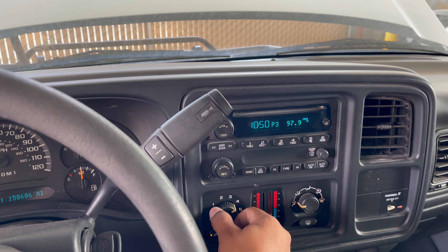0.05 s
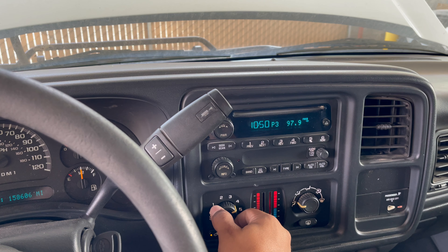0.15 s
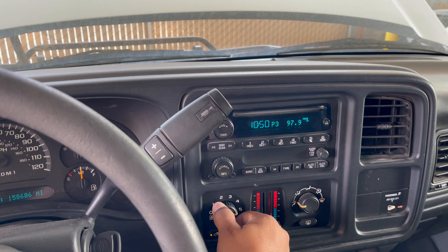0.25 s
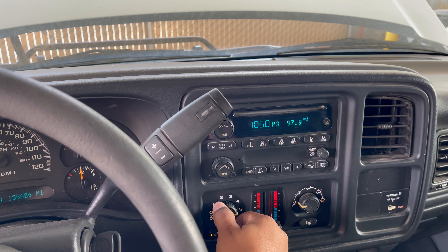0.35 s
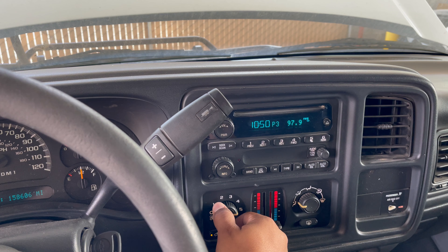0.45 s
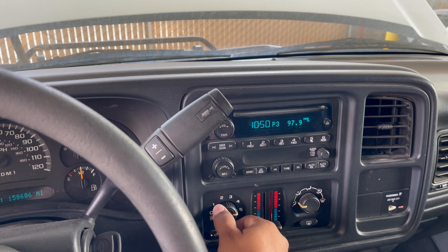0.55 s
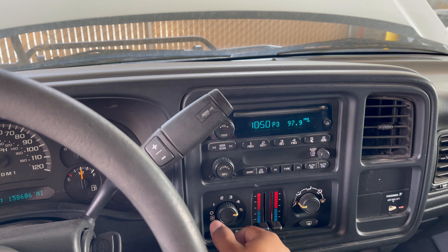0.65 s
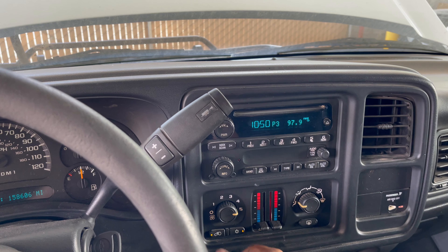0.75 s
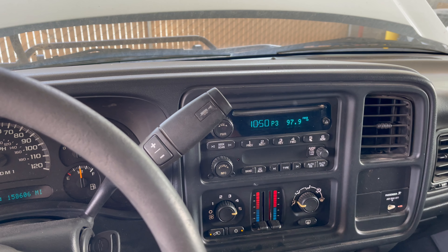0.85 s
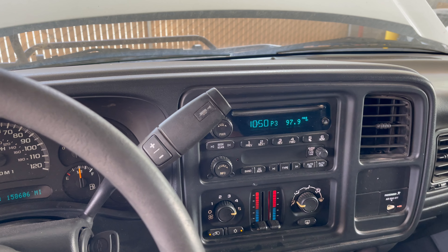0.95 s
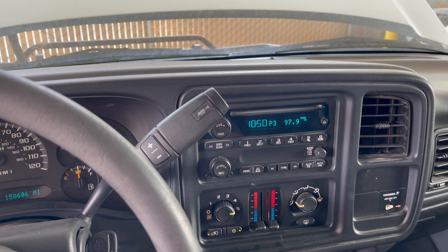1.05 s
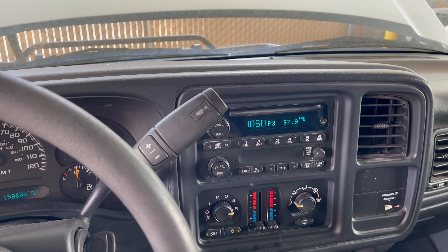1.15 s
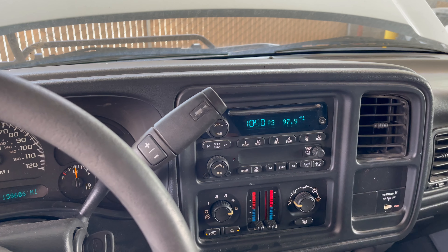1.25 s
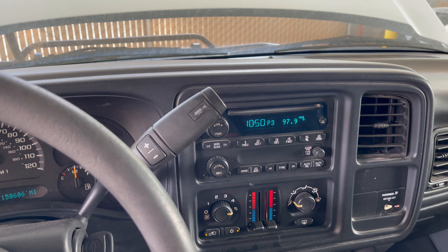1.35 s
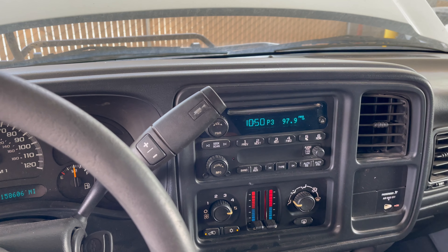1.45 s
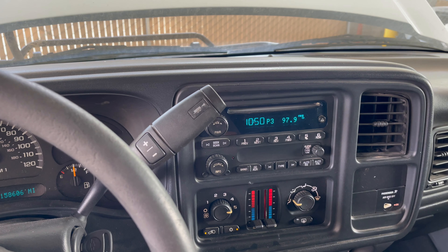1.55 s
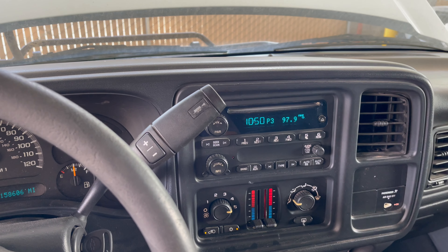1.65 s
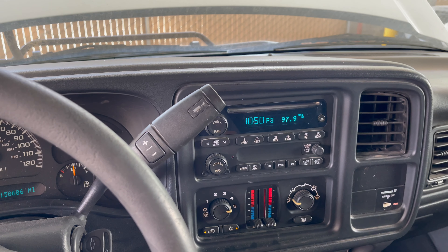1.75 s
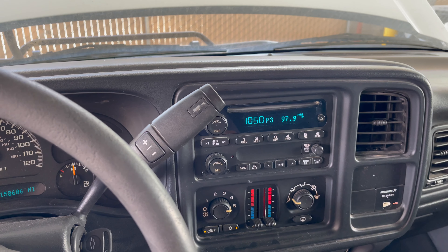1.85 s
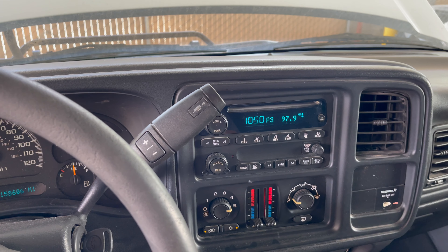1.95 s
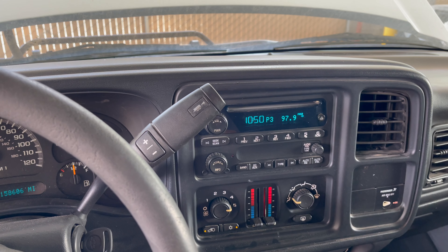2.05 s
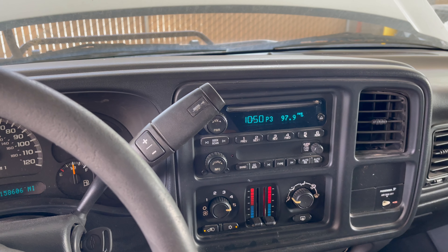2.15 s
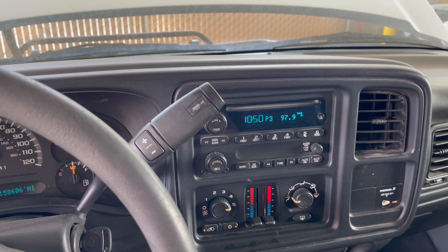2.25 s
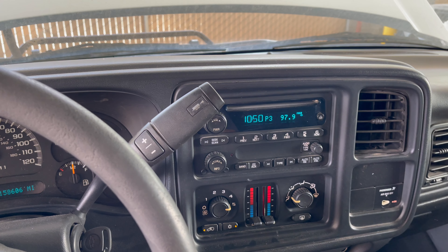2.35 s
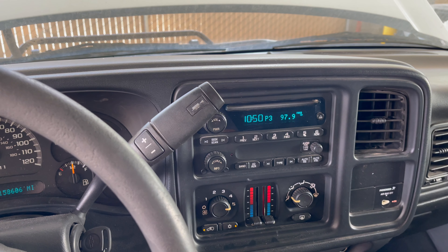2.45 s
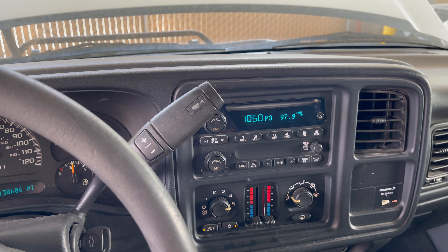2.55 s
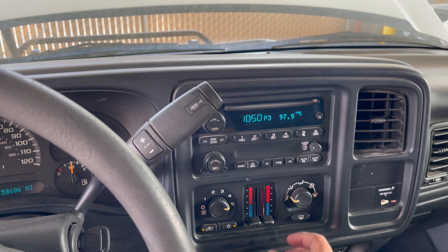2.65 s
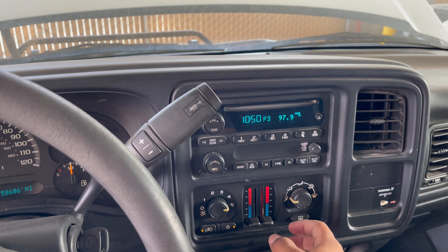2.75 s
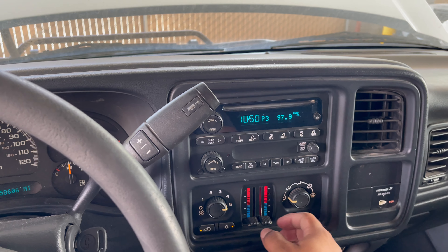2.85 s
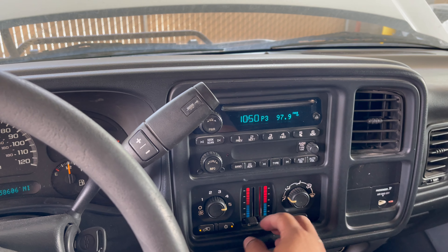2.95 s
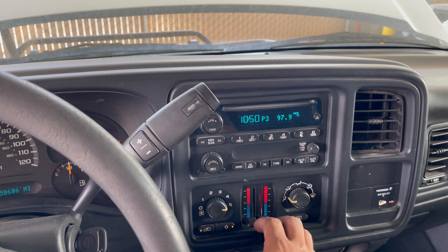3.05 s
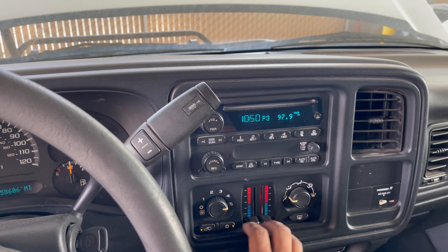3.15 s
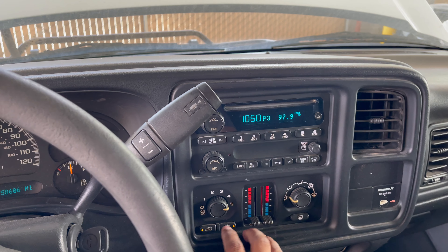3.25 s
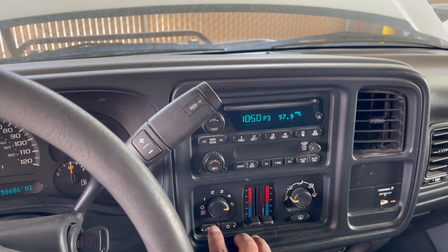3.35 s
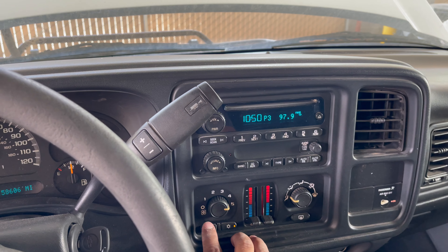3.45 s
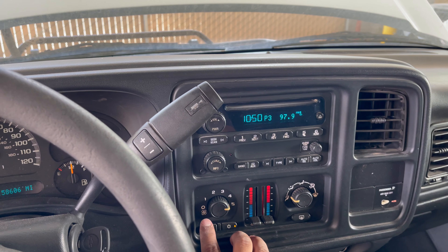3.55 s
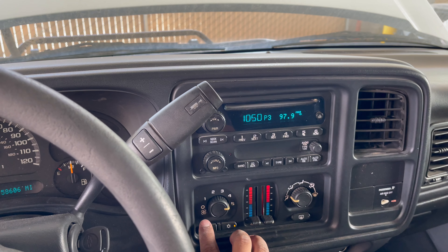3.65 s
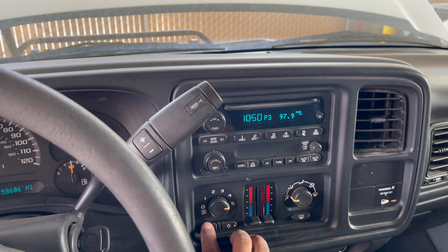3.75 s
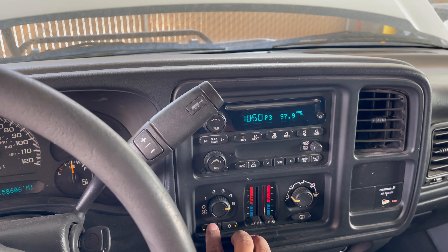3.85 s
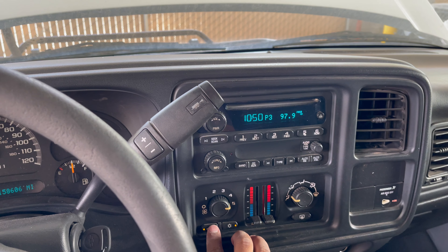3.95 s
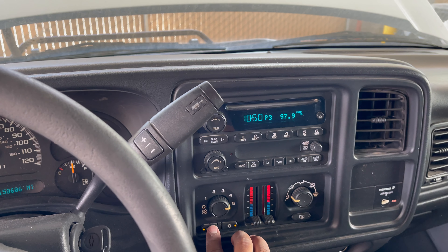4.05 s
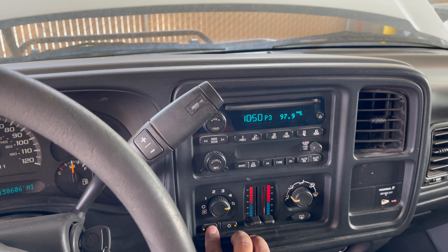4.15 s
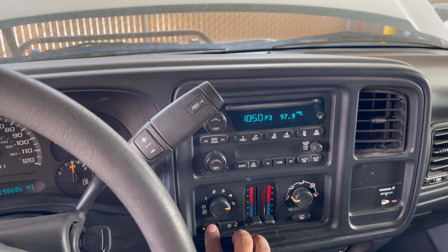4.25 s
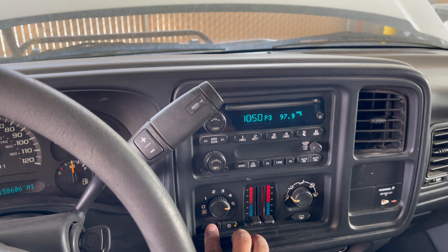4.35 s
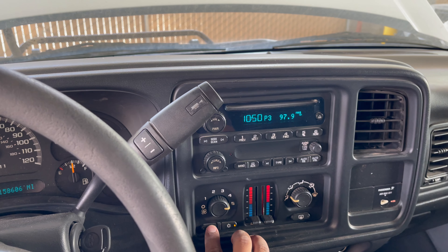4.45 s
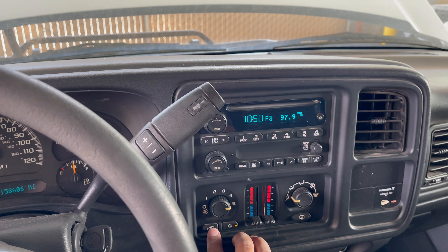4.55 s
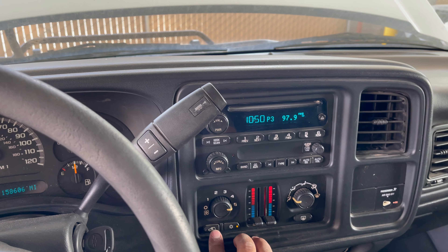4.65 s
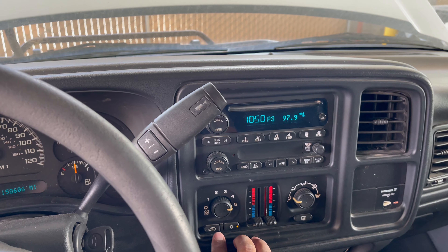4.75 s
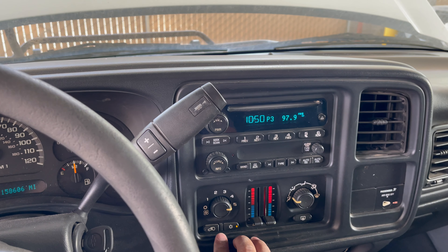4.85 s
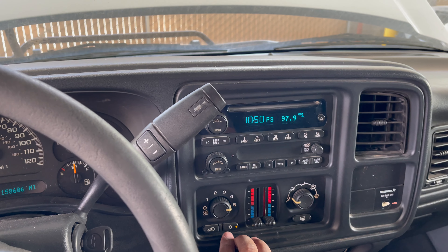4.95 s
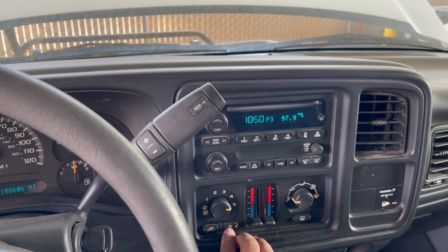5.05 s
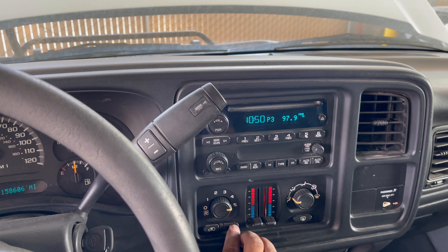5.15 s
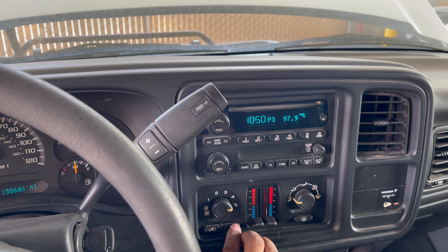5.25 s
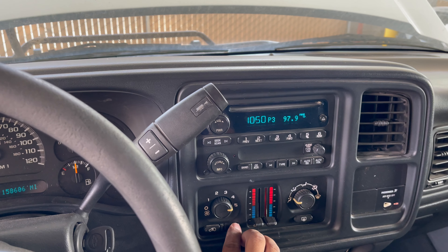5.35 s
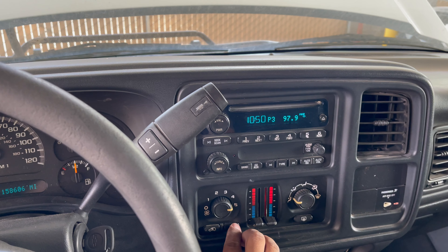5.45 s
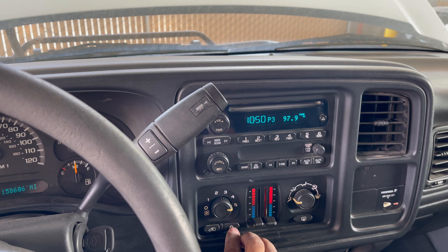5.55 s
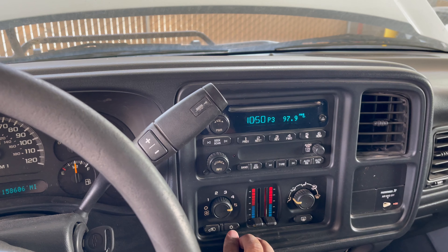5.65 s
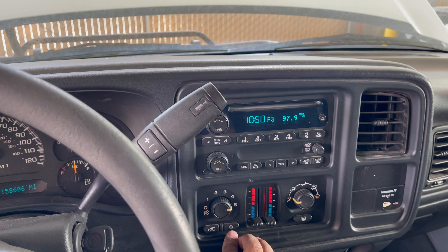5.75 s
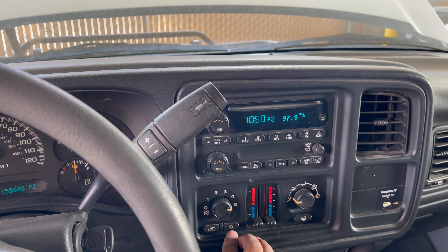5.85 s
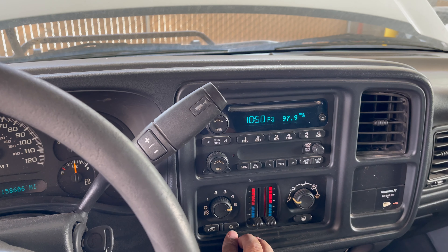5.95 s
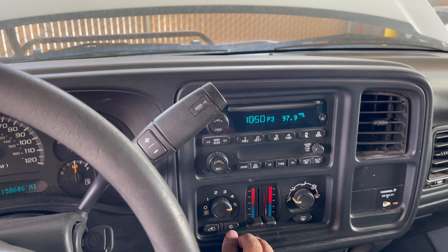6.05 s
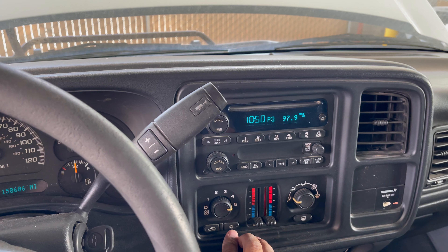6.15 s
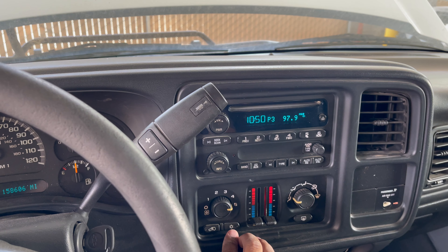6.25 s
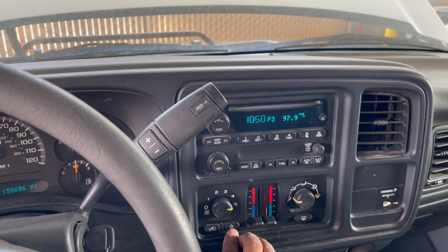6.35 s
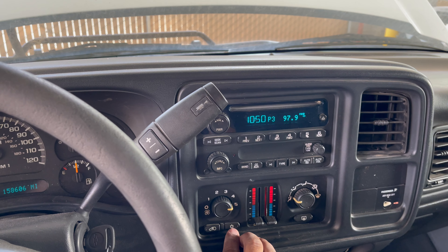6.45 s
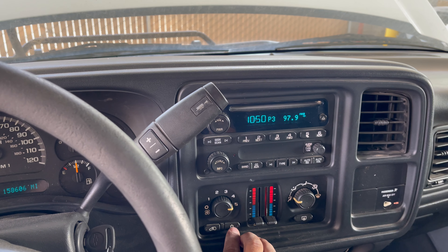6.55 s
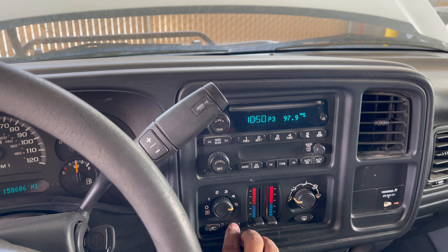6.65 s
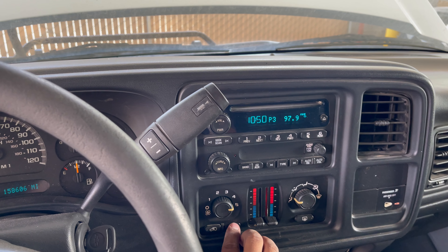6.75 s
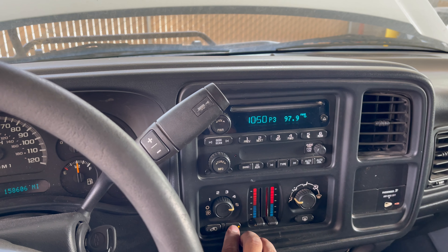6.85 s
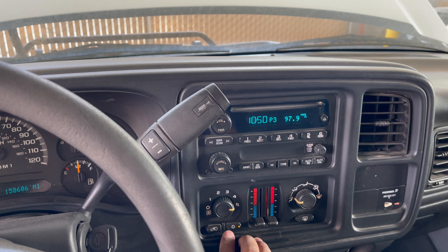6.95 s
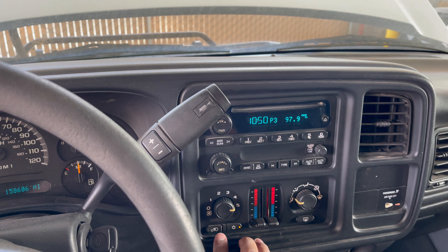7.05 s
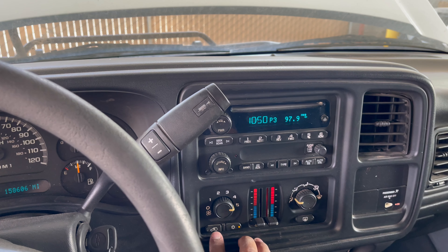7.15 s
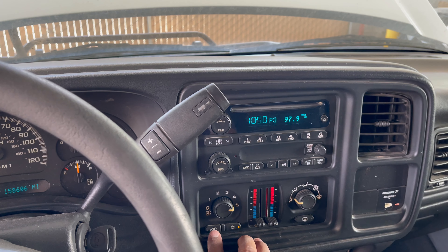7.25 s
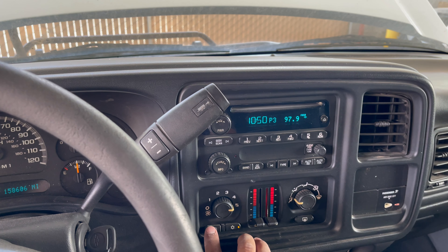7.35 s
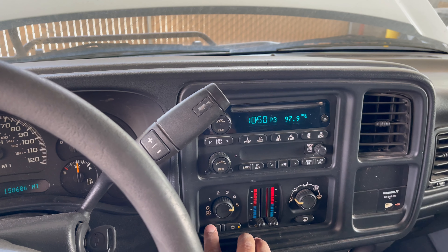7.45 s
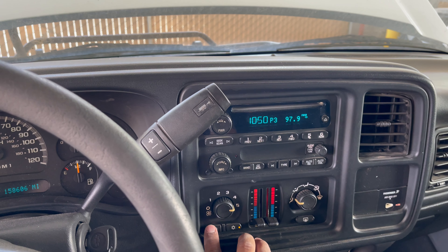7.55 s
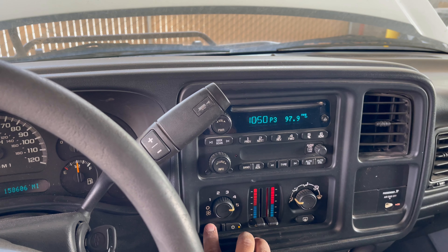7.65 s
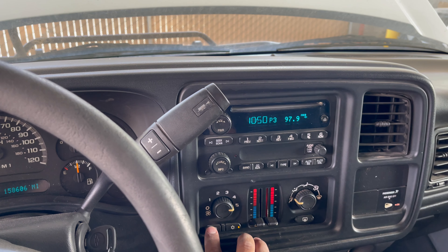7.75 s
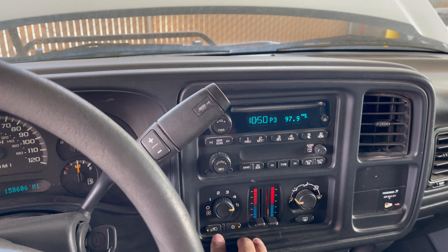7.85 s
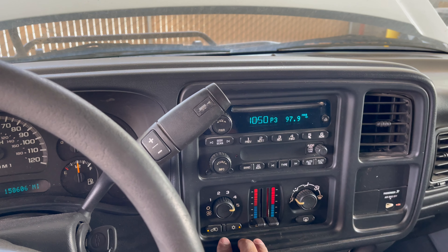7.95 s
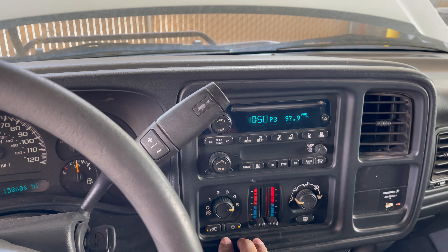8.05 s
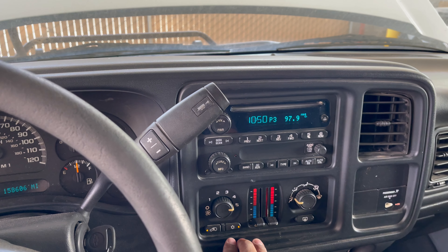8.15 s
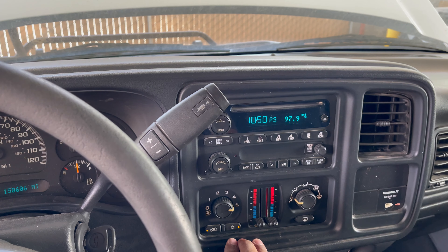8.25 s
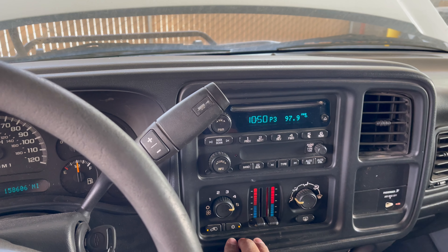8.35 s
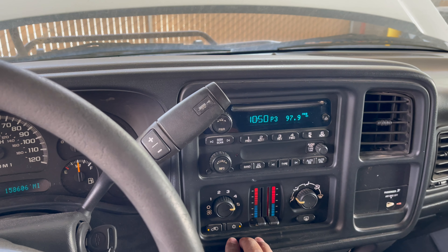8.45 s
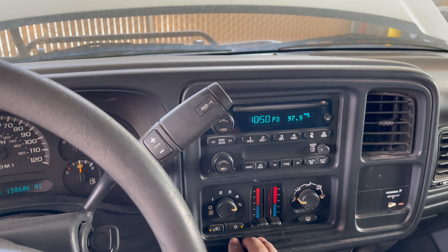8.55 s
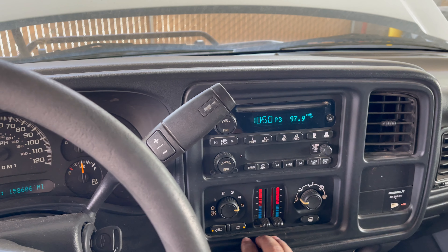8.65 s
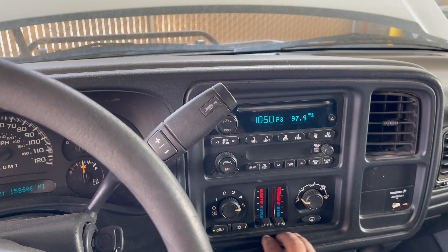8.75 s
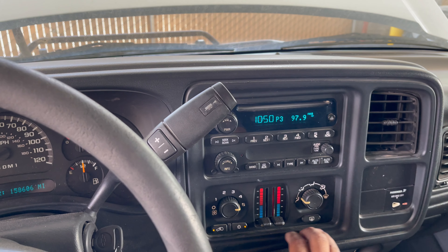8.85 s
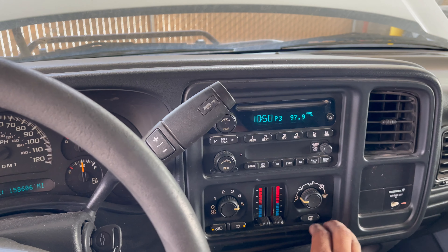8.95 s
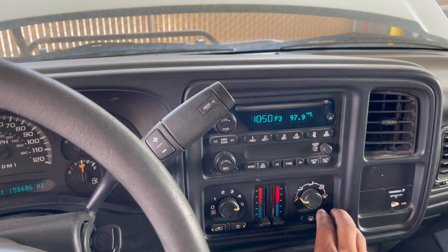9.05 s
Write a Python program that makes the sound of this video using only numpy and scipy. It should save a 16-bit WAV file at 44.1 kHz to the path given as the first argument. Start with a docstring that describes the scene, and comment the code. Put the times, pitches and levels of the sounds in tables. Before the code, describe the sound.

Inside a parked truck cab with the engine idling as a pure, very low hum, a plastic fan switch clicks almost at once. The blower climbs quickly for a moment, then holds a steady airy rush with faint breathy whistles from the vents. Its deep shaft hum beats slowly against the engine. The phone microphone sits in the air stream, so irregular thuds and sharp puffs buffet it until the end.

```python
"""A dashboard blower is switched up a step in a parked truck cab, heard by a phone held in the air stream.
First the switch clicks; then the fan shaft climbs past the idle hum of the engine and beats against it.
Shaped noise rushes and whistles from the vents, and noise puffs buffet the two microphone ports.
Meanwhile the phone folds more and more of the bass to mono, by feeding the left port to both channels."""
import sys
import numpy as np
from scipy import signal
from scipy.fft import rfft, irfft, next_fast_len
from scipy.io import wavfile
from scipy.ndimage import uniform_filter1d

SR = 44100
rng = np.random.default_rng(int(sys.argv[2]) if len(sys.argv) > 2 else 0)


def int16_out(signal):
    """Quantize to a 16-bit WAV file."""
    q = np.round(np.clip(np.atleast_2d(signal).T, -1, 1) * 32767)
    wavfile.write(sys.argv[1], SR, q.astype(np.int16))


def how_loud(loudness_db):
    """Turn decibels into a plain amplitude multiplier (0 dB gives 1, 20 dB gives 10)."""
    steps = np.asarray(loudness_db, float) / 20
    return 10 ** steps


N = 401310
T = np.arange(N) / SR  # time of each sample [s]
SIZE = next_fast_len(N)
HZ = np.arange(SIZE // 2 + 1) * SR / SIZE  # pitch of each spectrum bin

# colour of the thud of an eddy: (frequency [Hz], relative level [dB])
THUD = [(35, -10), (70, 3.5), (200, -5.5), (450, -11.5), (900, -21.5), (2000, -80), (6000, -120)]

STREAM_HIGH_DB = -36  # level of the air stream once the fan has settled
CANCEL_S = 2.06  # moment when the engine and shaft tones are opposed


def level(x, db):
    """Set the overall rms level in dB."""
    return x * how_loud(db) / np.sqrt(np.mean(x ** 2))


def over_hz(table):
    """Read a (frequency, value) table at every bin, evenly along a log pitch axis."""
    hz, value = np.transpose(table)
    return np.interp(np.log(HZ + 1), np.log(hz + 1), value)


def shape(x, gain):
    """Filter a sound by multiplying its spectrum."""
    return irfft(rfft(x, SIZE) * gain, SIZE)[..., :N]


def around(hz, log_width):
    """A smooth bell over pitch, for picking out one band."""
    return np.exp(-(np.log((HZ + 1) / hz) / log_width) ** 2)


def walk(rate):
    """Random wander with an rms of 1: rate new levels a second, smoothed twice."""
    k = int(SR / rate)
    steps = np.repeat(rng.standard_normal(N // k + 1), k)
    smooth = uniform_filter1d(uniform_filter1d(steps, k), k)
    return level(smooth[:N], 0)


def column(table, index):
    """Read one column of a table at every sample; its first column is time."""
    rows = np.array(table)
    return np.interp(T, rows[:, 0], rows[:, index])


def flow_db():
    """Level of the air stream: low, then easing up with the inertia of the fan after the switch."""
    low_db, switch_s, settle_s = -38.5, 0.24, 0.16
    return STREAM_HIGH_DB + (low_db - STREAM_HIGH_DB) * np.exp(-np.maximum(T - switch_s, 0) / settle_s)


def rush():
    """Smooth vent noise coloured by the ducts; the ports share part of it, with a lag that turns with pitch."""
    # colour of the rush: (frequency [Hz], relative level [dB])
    air_colour = [(26, -88), (40, -57), (60, -50.5), (110, -54), (250, -61), (700, -65.5), (2000, -68.5),
                  (3200, -75), (3900, -80), (6600, -82.5), (7200, -87.5), (8600, -89.5), (11600, -91.5),
                  (12450, -112), (12700, -150)]
    # duct and port resonances: (frequency [Hz], width [Hz], left boost [dB], right boost [dB])
    ducts = [(1040, 72, 9.5, -2.5), (1450, 79, 2.5, 2), (1510, 506, 7, 1.5), (4710, 710, 4.5, 0),
             (6240, 430, 2, -5), (10400, 3250, 7.5, 7.5)]
    # balance of the ports: (frequency [Hz], left minus right [dB])
    balance = [(60, -3.5), (110, 2), (200, 1), (360, -3), (640, 3), (1170, -3), (2110, 2.5), (3820, 3.5),
               (6910, 2), (12500, -0.5)]
    # likeness of the two ports: (frequency [Hz], share [0-1])
    alike_table = [(500, 0.05), (860, 0.15), (1150, 0.24), (1600, 0.61), (2600, 0.3), (5500, 0.2),
                   (7000, 0.27), (8350, 0.36), (8900, 0.63), (10200, 1), (11400, 0.72), (11900, .99)]
    # lag of the shared part: (frequency [Hz], left leads by [radians])
    lead_table = [(0, 0), (520, -0.1), (780, 1.4), (1460, 4.8), (1980, 4.5), (3270, 9.4), (5430, 3.2),
                  (6720, 6.7), (7670, 0.3), (8790, -0.2), (9730, -2.9), (10400, -3.2), (11700, -6.1),
                  (12700, -6.4)]

    left, own = rng.standard_normal((2, N))
    alike = np.clip(over_hz(alike_table), 0, 1)
    lead_hz, lead = np.transpose(lead_table)
    lag = np.exp(-1j * np.interp(HZ, lead_hz, lead))
    right = shape(left, alike * lag) + shape(own, np.sqrt(1 - alike ** 2))

    colour_db = over_hz(air_colour) + np.outer([0.5, -0.5], over_hz(balance))
    for hz, width_hz, *port_db in ducts:
        colour_db = colour_db + np.outer(port_db, np.exp(-(2 * (HZ - hz) / width_hz) ** 2))
    air = shape(np.array([left, right]), how_loud(colour_db))

    # the stream flaps across the ports, so the middle of the rush flutters
    middle = shape(air, around(900, 0.89))
    flutter_db = [2.0 * walk(70) + 1.1 * walk(30), 3.67 * walk(70) + 1.1 * walk(30)]
    air = air + middle * (how_loud(flutter_db) - 1)
    # lower down the rush comes in choppy patches, each band on its own
    for hz in (221, 415, 740):
        patch = shape(air, around(hz, 0.36))
        air = air + patch * (how_loud([2.16 * walk(22), 2.2 * walk(22)]) - 1)
    # the high duct hiss waxes and wanes slowly
    hiss = shape(air, around(4900, 0.2))
    air = air + hiss * (how_loud(walk(1.64)) - 1)

    # the band that sets the level; it sits 3 dB above the stream level
    audible = shape(air, (HZ > 900) & (HZ < 6000))
    flicker_db = np.array([0.63 * walk(9), 0.28 * walk(8)])
    return air / np.std(audible) * how_loud(flow_db() + flicker_db + 3.0)


def gust_db():
    """Strength of the buffeting: a chance wander that follows the stream, with gusts added on top."""
    # gusts: (time [s], strength [dB], half length [s])
    swells = [(0.454, -26.5, 0.2), (0.985, -24, 0.035), (1.283, -22, 0.021), (1.924, -25, 0.061),
              (2.713, -26.5, 0.065), (3.223, -30, 0.19), (3.856, -31, 0.016), (4.557, -25.5, 0.035),
              (6.57, -37, 0.049), (7.152, -37, 0.035), (7.8, -21, 0.016), (8.173, -27, 0.05),
              (8.54, -31, 0.021), (8.863, -24.5, 0.034)]
    usual_db, wander_db, wanders_per_s = -29, 1.5, 12
    wander = wander_db * np.tanh(walk(wanders_per_s))
    power = how_loud(usual_db + flow_db() - STREAM_HIGH_DB + wander) ** 2
    for s, db, half_s in swells:
        power = power + how_loud(db) ** 2 * np.exp(-((T - s) / half_s) ** 2)
    return 10 * np.log10(power)


def gusts():
    """Eddies break on each port in uneven noise puffs; thuds and snaps swell together, snaps louder right."""
    # colour of a snap on the left port: (frequency [Hz], relative level [dB])
    left_colour = [(150, -6), (400, -4), (800, 1.5), (1500, 1), (2600, -14.5), (4500, -24), (9000, -70),
                   (13000, -110)]
    # crisper colour on the right port: (frequency [Hz], relative level [dB])
    right_colour = [(150, -30), (500, -2), (1000, 3), (1800, 3), (2800, -12), (4500, -24), (9000, -70),
                    (13000, -110)]
    ports, stream_db, strength_db = [], flow_db(), gust_db()
    for snap_db, spread_db, colour in [(-4.0, 9.3, left_colour), (-2.5, 19.0, right_colour)]:
        swell = walk(18)
        # the small eddies level off: none grows into a full buffet
        puffs_db = 16 * np.tanh((spread_db * walk(250) + 4 * swell) / 16)
        snaps = shape(rng.standard_normal(N) * how_loud(puffs_db), how_loud(over_hz(colour)))
        heaves_db = 4.4 * np.tanh((6.0 * walk(50) + 2.9 * walk(26) + 0.66 * swell) / 4)
        thuds = shape(rng.standard_normal(N) * how_loud(heaves_db), how_loud(over_hz(THUD)))
        # a slower stream sheds far weaker eddies
        snap_gain = how_loud(0.44 * strength_db - 23.0 + 2.3 * (stream_db - STREAM_HIGH_DB))
        ports.append(level(snaps, snap_db) * snap_gain + level(thuds, -4.0) * how_loud(strength_db))
    return np.array(ports)


def bursts(times, levels_db, length_s, colour, shifts):
    """A puff of noise at each time, its colour shifted in pitch; each level is the rms at its loudest."""
    t = np.arange(-1000, 1000) / SR
    # a sharp core inside a weaker, ragged skirt
    skirt = np.exp(-(t / np.where(t < 0, 0.004, 0.007)) ** 2)
    swell = np.exp(-(t / length_s) ** 2) + how_loud(-10.0) * skirt
    # one pressure dip at the centre keeps the click whole across pitch
    suck = -how_loud(15.0) * (t == 0)
    spectra = rfft(rng.standard_normal((len(times), len(t))) * swell + suck)
    log_hz = np.log(np.fft.rfftfreq(len(t), 1 / SR) + 1)
    colour_hz, colour_db = np.transpose(colour)
    out = np.zeros(N + len(t))
    for s, db, shift, spectrum in zip(times, levels_db, shifts, spectra):
        gain = how_loud(np.interp(log_hz, np.log(shift * colour_hz), colour_db))
        puff = irfft(spectrum * gain) * np.hanning(len(t))
        top = uniform_filter1d(puff ** 2, size=120).max()
        start = int(s * SR)
        out[start:start + len(t)] += how_loud(db) * puff / np.sqrt(top)
    return out[len(t) // 2:][:N]  # centres each puff on its time


def buffets():
    """Each strong eddy snaps on either port and thuds in both, as short bursts of noise."""
    # strongest buffets: (time [s], left snap [dB], right snap [dB], thud [dB], snap centre [Hz])
    strong = [(0.35, -28, -29, -27, 900), (0.395, -30, -34, -25, 800), (0.48, -28, -31, -27, 900),
              (0.52, -30, -29, -29, 905), (0.656, -28, -23, -32, 1300), (1.238, -31, -23, -45, 2200),
              (1.258, -25, -26, -26, 800), (1.267, -28, -29, -36, 1500), (1.284, -29, -27, -35, 1300),
              (1.347, -29, -23.5, -41, 2250), (1.882, -25, -26, -32, 910), (2.209, -26, -31, -24.5, 1290),
              (2.4, -20, -23, -23, 1360), (2.52, -21, -27, -21, 1000), (2.698, -24, -23.5, -22.5, 1400),
              (3.04, -41, -22, -41, 1650), (3.24, -30, -38, -21, 1080), (3.59, -26, -30, -26, 1420),
              (3.748, -23, -31, -39, 1160), (3.891, -31, -22.5, -45, 1400), (4.017, -33, -27, -45, 2200),
              (4.028, -29, -24, -37, 1700), (4.0349, -15.5, -20, -18.5, 1650), (4.039, -27, -31, -28, 1300),
              (4.212, -33, -23, -43, 1430), (4.829, -24, -23, -45, 1400), (5.802, -29, -21, -25, 1010),
              (5.878, -20, -31, -28, 1100), (6.037, -23, -37, -26.5, 2100), (6.15, -29, -24, -40, 1430),
              (6.513, -22, -25, -35, 970), (6.575, -32, -23, -25, 2100), (6.733, -24, -27, -35, 1700),
              (6.746, -30, -24, -22.5, 1700), (6.921, -19, -24, -27, 1500), (6.927, -28, -29, -24, 1000),
              (7.365, -17.5, -24, -25, 1450), (7.484, -28, -27, -45, 1720), (7.531, -35, -23, -20, 1630),
              (7.789, -39, -30, -23, 800), (7.804, -32, -30, -21, 700), (8.02, -28, -24, -31, 1300),
              (8.159, -30, -24, -45, 1380), (8.166, -29, -27, -40, 1400), (8.188, -21.5, -35, -22.5, 700),
              (8.202, -18.5, -28, -20, 1100), (8.2048, -22, -28, -38, 1400), (8.207, -23, -33, -43, 1550),
              (8.421, -27, -22, -29, 1600), (8.659, -35, -24, -21, 1760), (8.79, -30, -20.5, -45, 1670),
              (8.8405, -29, -22.5, -37, 2400), (8.8425, -27, -24, -38, 1600)]
    # colour of the snap of a strong eddy: (frequency [Hz], relative level [dB])
    snap_colour = [(150, -11), (400, -1), (800, 0.5), (1400, 4), (2300, -11.5), (3300, -20.5), (6000, -65),
                   (13000, -110)]
    colour_centre_hz = 1360  # a smaller eddy shifts it up
    times, left_db, right_db, thud_db, snap_hz = np.transpose(strong)
    shifts = snap_hz / colour_centre_hz
    snaps = [bursts(times, db, 0.00038, snap_colour, shifts) for db in (left_db, right_db)]
    thuds = bursts(times, thud_db, 0.0048, THUD, np.ones(len(times)))
    return np.array(snaps) + thuds


def whistles():
    """Breathy tones at the vent slats drift in pitch and come and go in fits, differently on each port."""
    # tones: (frequency [Hz], drift [Hz], level against the stream before it wavers [dB])
    tones = [(1074, 25, -20), (1380, 60, -9.5), (1458, 40, -14), (1560, 64, -14.5), (1700, 97, -15.5)]
    ports = np.zeros((2, N))
    for hz, drift_hz, db in tones:
        for port in ports:
            phase = 2 * np.pi * np.cumsum(hz + drift_hz * walk(11)) / SR
            port += how_loud(db + 3.9 * walk(30)) * walk(60) * np.sin(phase)
    # they fade faster than the stream when it is slow
    return ports * how_loud(STREAM_HIGH_DB + 2.2 * (flow_db() - STREAM_HIGH_DB))


def shaft():
    """The unbalanced fan shaft hums once a turn; the housing buzzes with its wavering overtones."""
    # blower shaft: (time [s], turns per second [Hz], hum level [dB])
    fan = [(0.0, 38.639, -40.3), (0.3, 40.644, -37.8), (0.5, 48.194, -30.5), (0.75, 48.679, -31.7),
           (1.0, 49.112, -30.5), (1.4, 49.036, -29.7), (3.0, 49.063, -30.5), (5.0, 49.091, -30.2),
           (6.0, 48.985, -29.7), (7.0, 49.112, -29.4), (8.0, 49.272, -28.8), (9.1, 49.144, -28.8)]
    # overtones: (multiple of the turns, waver rate [Hz], level over the hum before the buzz is added [dB])
    overtones = [(2, 12, -11.5), (4, 14, -15), (6, 18, -17.5), (9, 8, -23), (12, 10, -24)]
    # how hard the housing buzzes with the overtones: (time [s], added level [dB])
    buzz = [(0, 4), (.6, 1.5), (1.2, 5), (1.9, 5), (2.6, 3), (5, 0.5), (7, -.5), (9.1, -2)]
    turns = np.cumsum(column(fan, index=1)) / SR
    angle = 2 * np.pi * (turns - np.interp(CANCEL_S, T, turns))
    tone = -np.sqrt(2) * np.sin(angle)  # the minus sign opposes the engine
    for multiple, waver_hz, db in overtones:
        order = multiple * angle
        wavering = walk(waver_hz) * np.sin(order) + walk(waver_hz) * np.cos(order)
        tone = tone + how_loud(db + column(buzz, index=1)) * wavering
    return tone * how_loud(column(fan, index=2))


def knob():
    """The switch detent clicks home and bounces: short scrapes of noise ring the modes of its plastic."""
    # detent clicks: (time [s], peak level before panning [dB], left minus right [dB])
    clicks = [(0.2311, -22, 7), (0.237, -26, 4), (.2445, -36, 0)]
    # its plastic body: (frequency [Hz], relative level [dB], time to fall by 60 dB [s])
    modes = [(2280, -13, 0.0021), (3500, -13, 0.0018), (4400, 0, 0.0025), (4950, -4, .002),
             (6100, -7, .002), (7730, 3, 0.0047), (9200, 0, 0.0042), (10500, -4, 0.0031),
             (11300, 6, 0.0065), (13000, -16, .002)]
    out = np.zeros((2, N))
    t = T[:SR // 20]
    ring = sum(how_loud(db) * np.sin(2 * np.pi * hz * t) * np.exp(-np.log(1000) * t / t60)
               for hz, db, t60 in modes)
    lowpass = signal.butter(5, 13000, fs=SR, output="sos")
    for s, db, pan_db in clicks:
        scrape = rng.standard_normal(400) * np.exp(-(T[:400] / 0.0041) ** 2)
        click = signal.sosfilt(lowpass, np.convolve(ring, scrape)[:len(t)])
        gain = how_loud(db + np.array([[pan_db], [-pan_db]]) / 2)
        start = int(s * SR)
        out[:, start:start + len(t)] += gain * click / np.abs(click).max()
    return out


def engine():
    """The idling engine fires at a steady rate, heard as one pure low tone."""
    firing_hz, rms_db = 45.985, -30.5
    return np.sqrt(2) * how_loud(rms_db) * np.sin(2 * np.pi * firing_hz * (T - CANCEL_S))


def scene():
    """Everything at the two ports."""
    return rush() + gusts() + buffets() + whistles() + shaft() + knob() + engine()


def fold_bass(ports):
    """Below a climbing crossover the left port feeds both channels, lagging in the right as it fades out."""
    start_hz, end_hz, creep_s = 164, 667, 2  # the crossover creeps up and levels off
    hz, s, (left, right) = signal.stft(ports, SR, nperseg=1024)
    crossover_hz = end_hz + (start_hz - end_hz) * np.exp(-s / creep_s)
    above = (hz[:, None] + 1) / crossover_hz
    parted = 1 / np.sqrt(1 + above ** -24)  # 0 below the crossover, 1 above
    shared = 1 - parted ** 2 * (1 - 1 / np.sqrt(1 + (above / 1.25) ** 7))
    lag = np.exp(-1j * 2.0 * parted ** 2)
    right = shared * lag * left + np.sqrt(1 - shared ** 2) * right
    return signal.istft(np.array([left, right]), SR, nperseg=1024)[1][:, :N]


def low_pass(x):
    """Removes everything above the highest recorded frequency."""
    return signal.sosfilt(signal.butter(12, 16000, fs=SR, output="sos"), x)


def record(dry):
    """The phone cuts the lowest bass and folds more and more of the rest of the bass to mono."""
    highpass = signal.butter(4, 33, "highpass", fs=SR, output="sos")
    mix = fold_bass(signal.sosfilt(highpass, dry))
    return low_pass(mix)


dry = scene()
out = record(dry)
int16_out(out)
```